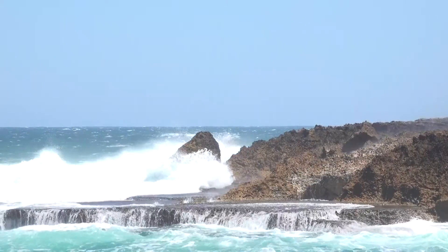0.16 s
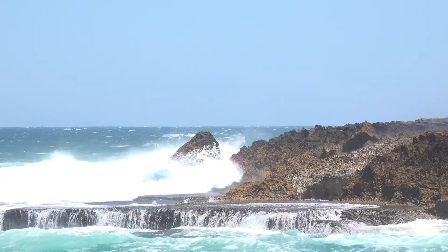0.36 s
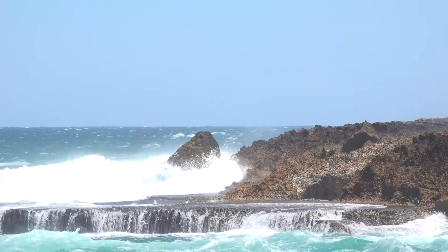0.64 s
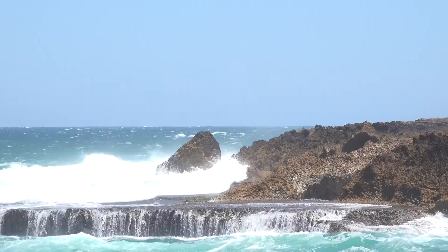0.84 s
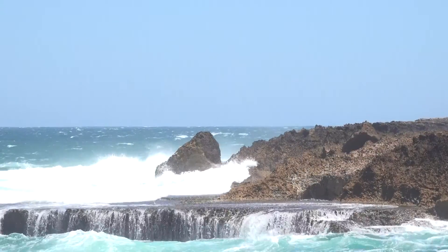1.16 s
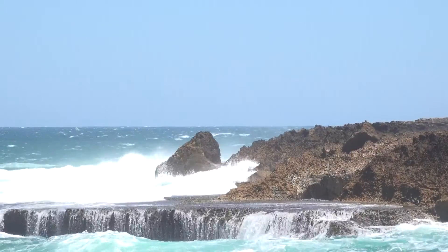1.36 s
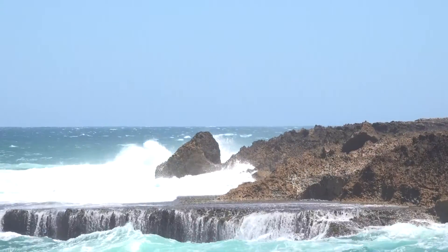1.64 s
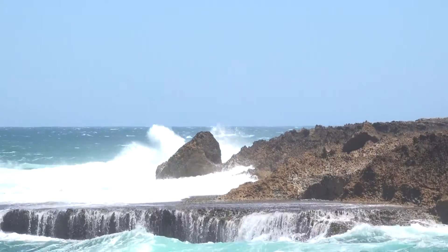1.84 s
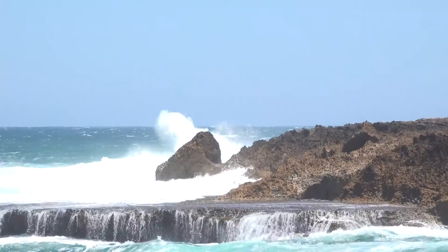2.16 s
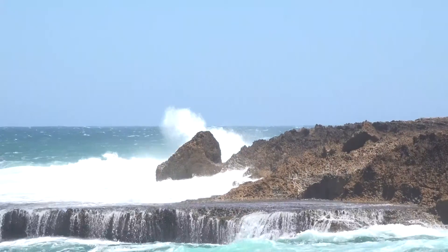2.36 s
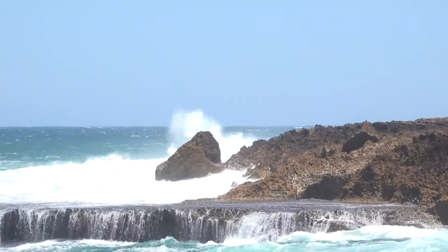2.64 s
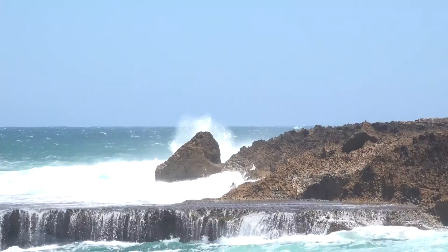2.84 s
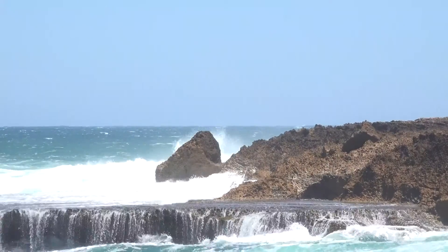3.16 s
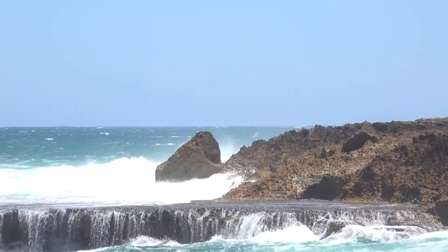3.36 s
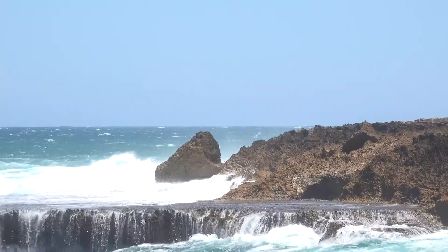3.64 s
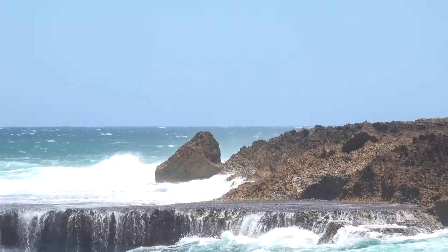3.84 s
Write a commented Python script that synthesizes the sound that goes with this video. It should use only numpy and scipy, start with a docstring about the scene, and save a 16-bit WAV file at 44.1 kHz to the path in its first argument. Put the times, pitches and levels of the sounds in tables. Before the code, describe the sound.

Surf roars and fizzes over coastal rocks while wind gusts thump and flutter on the microphone.

```python
"""Surf breaks on coastal rocks some way off: a wide roar with fizz on top, slowly fading.
Soon wind eddies drag over the microphone, thumping low and fluttering mostly in the left port.
Surf is noise shaped in short spectra; drops of spray nearby tick as tiny puffs of high hiss.
The wind is a row of noise eddies swept past at a changing speed, with a lumpy flutter on top.
Gain control dips everything under the hardest thumps."""
import sys
import numpy as np
from scipy import signal
from scipy.fft import rfft, irfft
from scipy.io import wavfile
from scipy.ndimage import uniform_filter1d

SR = 44100
rng = np.random.default_rng(int(sys.argv[2]) if len(sys.argv) > 2 else 0)


def persist_wave(psi):
    """Save psi, clipped to +-1, as 16-bit WAV."""
    counts = np.round(np.clip(psi, -1, 1) * 32767).astype(np.int16)
    wavfile.write(sys.argv[1], SR, np.atleast_2d(counts).T)


N = 176400  # 4 s

# Distant surf swelling and easing. Each row: time in seconds, roar level in dB per band, fizz level in dB per band.
SURF_LEVELS = [(0.0, -39.5, -48), (0.18, -42, -49), (0.23, -42, -46), (0.29, -42.5, -50.5),
               (0.52, -44, -46.5), (0.93, -44, -53), (1.31, -43, -51), (1.6, -44, -51.5), (1.74, -47, -56),
               (1.79, -45.5, -54), (1.89, -48, -57), (2.34, -45.5, -53), (2.64, -46.5, -55.5),
               (3.08, -44.5, -53.5), (3.26, -45, -55), (3.43, -45.5, -53), (3.49, -44.5, -55),
               (3.54, -51, -58), (3.56, -47, -57), (3.97, -44.5, -54.5)]
# Colour of the surf at the microphone. Each row: frequency in Hz, relative density in dB per Hz.
SURF_COLOUR = [(20, -14), (60, 0.5), (150, -4), (300, -1), (500, -4), (900, -8), (2000, -12.5), (2800, -18),
               (4300, -20.5), (5900, -27), (6900, -29.5), (7900, -28.5), (9500, -37), (11500, -41),
               (14100, -44)]
# Surf between the two ports. Each row: frequency in Hz, left minus right in dB.
SURF_BALANCE = [(60, 6), (130, 2.5), (280, 7), (610, 9), (1330, 6.5), (2880, 4.5), (6260, 2.5), (13600, 0)]
# How alike the ports hear the surf. Each row: frequency in Hz, likeness from 0 to 1.
SURF_LIKENESS = [(60, .98), (200, .96), (700, .98), (2000, .995), (5200, .995), (5900, .8), (7000, .55),
                 (8700, .3), (10000, .45), (14000, .7)]
# Phase of the surf between the ports. Each row: frequency in Hz, lead of the left port in radians.
SURF_LEFT_LEAD = [(0, 0), (5400, 0), (5900, .8), (7900, 2.7), (9500, 4.1), (11000, 4.6), (14000, 6.2)]
# Drops of spray close by. Each row: start in seconds, level in dB before rise and decay.
SPRAY_DROPS = [(0.0594, -58), (0.4838, -46), (0.9194, -53), (1.5444, -49), (2.4288, -54), (3.0594, -53)]
# Gusts over the microphone. Each row: time in seconds, thump level in dB, flutter level in dB
# (levels before the split between ports and the gain control).
GUSTS = [(0.0, -45, -43), (0.09, -47, -40), (0.25, -18, -31), (0.29, -13, -24.5), (0.32, -24.5, -36.5),
         (0.43, -18, -42), (0.45, -22, -42), (0.55, -37, -44), (0.61, -23.5, -31.5), (0.67, -14.5, -41),
         (0.7, -28.5, -37), (0.73, -19, -32), (0.77, -37, -43), (0.8, -28, -34), (0.89, -20.5, -41.5),
         (0.94, -52, -37), (1.08, -36.5, -49), (1.15, -48, -39), (1.28, -35.5, -43), (1.31, -32.5, -36),
         (1.39, -29.5, -37), (1.43, -40, -24.5), (1.46, -22, -35), (1.61, -18.5, -31), (1.64, -31, -29.5),
         (1.67, -17, -17.5), (1.7, -16, -28.5), (1.91, -21, -34), (1.96, -20, -27.5), (1.99, -36, -46),
         (2.08, -31, -50), (2.22, -43, -45), (2.29, -30.5, -41), (2.33, -19, -24), (2.51, -20, -28.5),
         (2.53, -11, -31), (2.55, -27, -35), (2.6, -18.5, -28.5), (2.64, -29, -50), (2.66, -31, -37),
         (2.71, -20.5, -36), (2.79, -25.5, -36), (2.92, -22, -37), (3.02, -35, -47), (3.07, -21, -36),
         (3.15, -20, -24), (3.27, -20, -28), (3.31, -30, -42.5), (3.37, -29, -21.5), (3.41, -16, -31.5),
         (3.46, -21, -28), (3.52, -15.5, -23.5), (3.57, -25.5, -43), (3.65, -36, -36), (3.75, -24.5, -27),
         (3.78, -23, -34), (3.81, -22.5, -29), (3.91, -28, -39.5), (3.95, -24, -32), (3.97, -21.5, -28)]
# Eddy pitch, following the wind speed. Each row: time in seconds, pitch in Hz.
EDDY_PITCH = [(0, 68.6), (.17, 72.2), (.24, 54.3), (.34, 71.5), (.4, 61.6), (.47, 54.1), (.68, 63.83),
              (.8, 55.36), (.9, 64.3), (1.3, 67.9), (1.47, 52.8), (1.58, 79.76), (1.72, 58.1),
              (1.78, 83.35), (1.91, 82.62), (2.15, 49.9), (2.27, 81.8), (2.55, 71.46), (2.76, 54.1),
              (2.9, 55.9), (3.08, 70.2), (3.22, 94.5), (3.34, 82), (3.43, 52.75), (3.55, 71.9),
              (3.67, 54.7), (3.74, 92.67), (3.84, 88.1), (3.91, 67.1), (3.97, 76)]
# Colour of the thumps at the reference pitch. Each row: frequency in Hz, relative density in dB per Hz.
EDDY_COLOUR = [(12, -38), (25, -4), (40, -3.5), (55, 3), (72, -4), (100, -9), (150, -29), (300, -55),
               (1500, -110)]
# Colour of the flutter. Each row: frequency in Hz, relative density in dB per Hz.
FLUTTER_COLOUR = [(60, -49), (110, -2), (140, -1.5), (200, -5.5), (300, -13.5), (500, -24.5), (900, -35),
                  (2000, -50.5), (5000, -110)]
# Wind between the two ports. Each row: frequency in Hz, left minus right in dB.
WIND_BALANCE = [(30, 5), (60, 1), (100, 7.5), (160, 9), (260, 15.5), (500, 9.5), (1000, 17)]
# How alike the ports hear the wind. Each row: frequency in Hz, likeness from 0 to 1.
WIND_LIKENESS = [(30, .999), (70, .99), (150, .92), (500, .95)]

ROAR_BAND_DB, FIZZ_BAND_DB, FIZZ_FROM_HZ = 7, 20, 3980  # whole surf over each band's level
PATCH_DB, SPLASH_DB = 0.44, 0.47  # rms swing of the surf level
FRAME, HOP = 1024, 256  # short-time spectra, in samples
DROP_T60_S, DROP_RISE_S, DROP_HZ, DROP_WIDTH_HZ = 0.016, 0.001, 10500, 2500
DROP_SAMPLES = 2048
EDDY_REF_HZ = 60
LUMP_DB, LUMP_S = 4, 0.031  # rms swing of the flutter lumps, and their smoothing
STEADY_S, STEADY_SHARE = 0.061, 0.74  # smoothing, and share of the level wander taken out
RIDE = 0.55  # how far the flutter follows each thump
DUCK_FROM_DB, DUCK_SHARE, RECOVER_DB_PER_S = -12, 0.24, 64  # recovery is of the sensed level
EDGE_HZ = 14200


def gain_of(db):
    """Turns dB into an amplitude factor."""
    return 10 ** (np.asarray(db) / 20)


def evened(x):
    """Scales x to an rms of 1."""
    return x / np.sqrt(np.mean(x ** 2) + 1e-20)


def read(points, hz):
    """Reads a frequency table, interpolating along log frequency."""
    f, value = np.transpose(points)
    return np.interp(np.log(hz + 1), np.log(f + 1), value)


def curve(table, t, column):
    """Reads one column of a time table, in straight lines between rows."""
    rows = np.array(table)
    return np.interp(t, rows[:, 0], rows[:, column])


def coloured(x, colour_db):
    """Filters x by a frequency table in dB."""
    hz = np.fft.rfftfreq(len(x), 1 / SR)
    return irfft(rfft(x) * gain_of(read(colour_db, hz)), len(x))


def smooth(x, s):
    """Runs a moving average of s seconds twice."""
    width = max(int(s * SR), 1)
    return uniform_filter1d(uniform_filter1d(x, width), width)


def steadied(x):
    """Takes out part of the slow wander in level, leaving rms 1."""
    power = smooth(x ** 2, STEADY_S) + 1e-12
    return evened(x / power ** (STEADY_SHARE / 2))


def surf():
    """Distant breakers: random short-time spectra with soft patches and broad splashes, at two ports."""
    frames, hz = N // HOP + 5, np.fft.rfftfreq(FRAME, 1 / SR)
    t = np.arange(frames) * HOP / SR
    a, b, c, d, patches = rng.standard_normal((frames, len(hz), 5)).T
    # A splash lifts all frequencies together; a patch is local in frequency and time.
    splash = evened(uniform_filter1d(patches[:40].mean(0), size=5))
    patches = uniform_filter1d(patches, size=14, axis=0)
    patches = evened(uniform_filter1d(patches, size=12, axis=1))

    fizz_share = (1 / (1 + (FIZZ_FROM_HZ / (hz + 1)) ** 4))[:, None]
    roar_db = curve(SURF_LEVELS, t, column=1) + ROAR_BAND_DB
    fizz_db = curve(SURF_LEVELS, t, column=2) + FIZZ_BAND_DB
    level_db = (1 - fizz_share) * roar_db + fizz_share * fizz_db

    same = np.clip(read(SURF_LIKENESS, hz), 0, 1)[:, None]
    lag = np.exp(-1j * read(SURF_LEFT_LEAD, hz))[:, None]
    left = a + 1j * b
    right = (same * left + np.sqrt(1 - same ** 2) * (c + 1j * d)) * lag
    tilt = gain_of(read(SURF_BALANCE, hz) / 2)[:, None]
    spectra = np.array([left * tilt, right / tilt]) * gain_of(read(SURF_COLOUR, hz))[:, None]

    # Bring the coloured noise to rms 1 before setting its level.
    steady = signal.istft(spectra, nperseg=FRAME, noverlap=FRAME - HOP)[1]
    scale = np.sqrt(np.mean(steady ** 2))
    spectra *= gain_of(level_db + PATCH_DB * patches + SPLASH_DB * splash) / scale
    return signal.istft(spectra, nperseg=FRAME, noverlap=FRAME - HOP)[1][:, :N]


def spray():
    """Single drops tick nearby: puffs of high hiss, rising at once and dying, separate in each port."""
    out = np.zeros((2, N + DROP_SAMPLES))
    t, hz = np.arange(DROP_SAMPLES) / SR, np.fft.rfftfreq(DROP_SAMPLES, 1 / SR)
    band = np.exp(-((hz - DROP_HZ) / DROP_WIDTH_HZ) ** 2)
    rise = np.minimum(t / DROP_RISE_S, 1)
    for s, db in SPRAY_DROPS:
        puff = evened(irfft(rfft(rng.standard_normal((2, DROP_SAMPLES))) * band))
        start = round(s * SR)
        out[:, start:start + DROP_SAMPLES] += puff * rise * gain_of(db - 60 * t / DROP_T60_S)
    return out[:, :N]


def buffet(t):
    """A frozen row of eddies swept past at the gust's speed, and a lumpy flutter riding on it."""
    place = np.cumsum(curve(EDDY_PITCH, t, column=1) / EDDY_REF_HZ)
    row = coloured(rng.standard_normal(2 * N), EDDY_COLOUR)
    thump = steadied(np.interp(place, np.arange(2 * N), row))

    lumps = evened(smooth(rng.standard_normal(N), LUMP_S / 2))
    flutter = steadied(coloured(rng.standard_normal(N), FLUTTER_COLOUR))
    # The small constant keeps some flutter between thumps.
    ride = (smooth(thump ** 2, LUMP_S / 2) + 0.071) ** (RIDE / 2)
    flutter = evened(flutter * gain_of(LUMP_DB * lumps) * ride)

    thump_gain = gain_of(curve(GUSTS, t, column=1))
    flutter_gain = gain_of(curve(GUSTS, t, column=2))
    return thump * thump_gain + flutter * flutter_gain


def wind():
    """Wind on the microphone: the right port hears a duller, partly different share of the buffeting."""
    t, hz = np.arange(N) / SR, np.fft.rfftfreq(2 * N, 1 / SR)
    one, other = rfft(buffet(t), 2 * N), rfft(buffet(t), 2 * N)
    same = np.clip(read(WIND_LIKENESS, hz), 0, 1)
    tilt = gain_of(-read(WIND_BALANCE, hz))  # right over left
    right = tilt * (same * one + np.sqrt(1 - same ** 2) * other)
    pair = np.array([one, right])
    return irfft(pair * 2 / (1 + tilt))[:, :N]


def scene():
    """Far surf, nearby spray and wind on the ports add up."""
    return surf() + spray() + wind()


def record(dry):
    """Gain control dips everything under loud thumps; then a low-pass sets the band limit."""
    power_db = 10 * np.log10(abs(uniform_filter1d((dry ** 2).mean(0), size=600)) + 1e-12)
    # The sensed level jumps up with the power and falls back at a fixed rate.
    fall_db = np.arange(N) * RECOVER_DB_PER_S / SR
    held_db = np.maximum.accumulate(power_db + fall_db) - fall_db
    over_db = np.maximum(held_db - DUCK_FROM_DB, 0)
    ducked = dry / gain_of(DUCK_SHARE * uniform_filter1d(over_db, size=200))
    low_pass = signal.firwin(1023, EDGE_HZ, window=("kaiser", 9), fs=SR)
    return signal.oaconvolve(ducked, low_pass[None], "same")


dry = scene()
out = record(dry)
persist_wave(out)
```